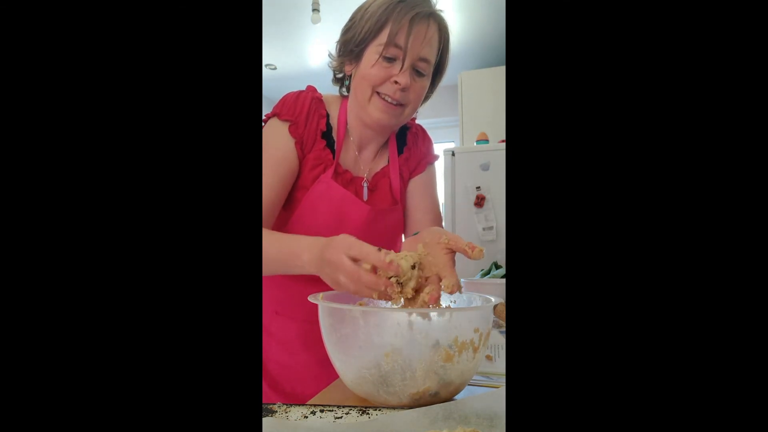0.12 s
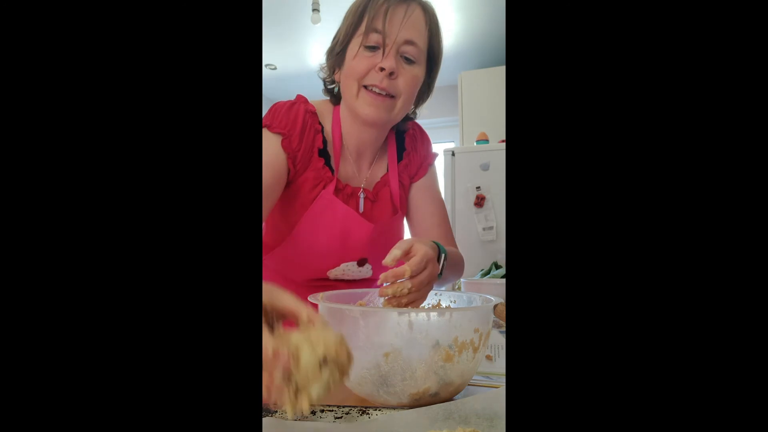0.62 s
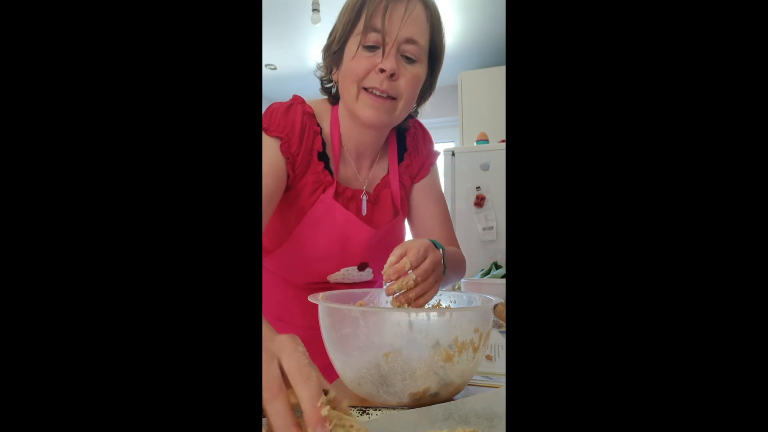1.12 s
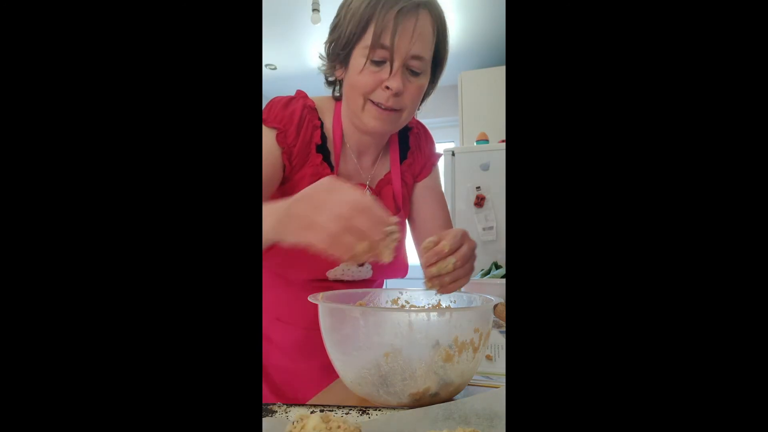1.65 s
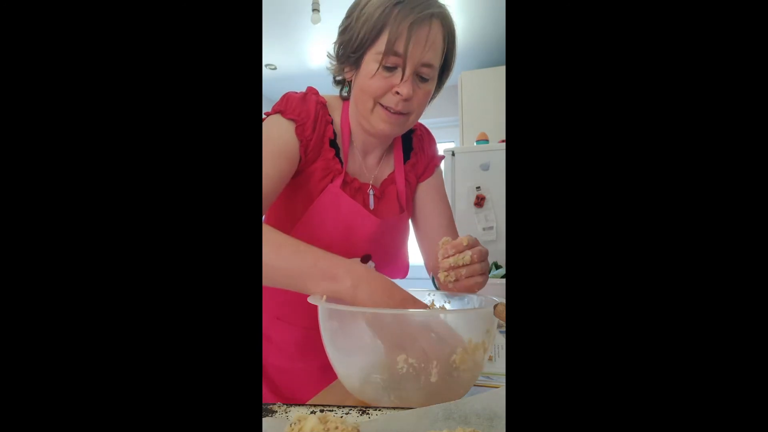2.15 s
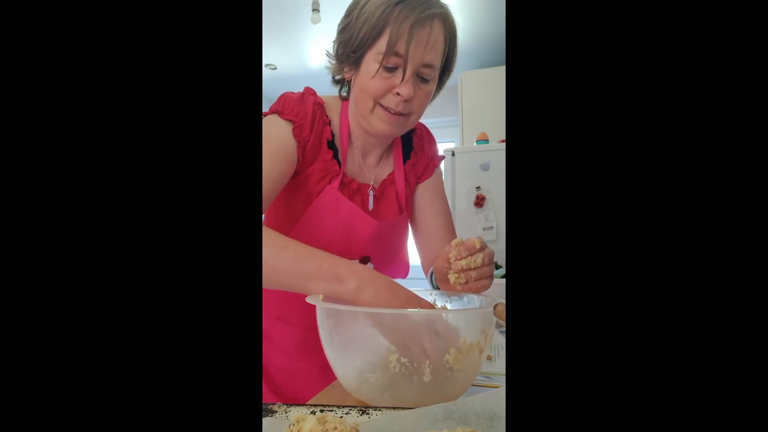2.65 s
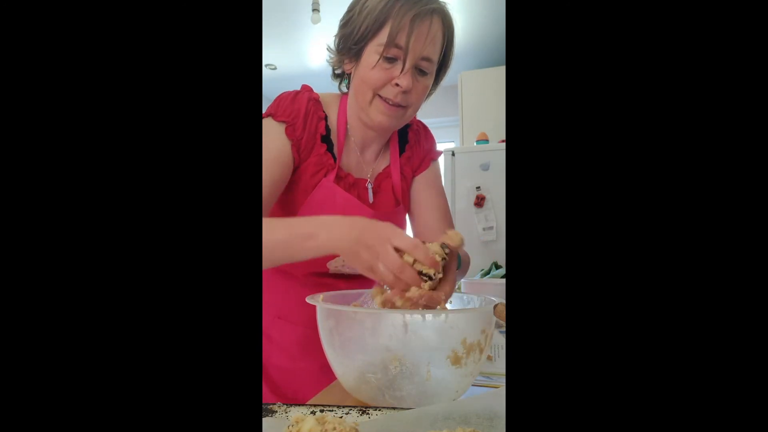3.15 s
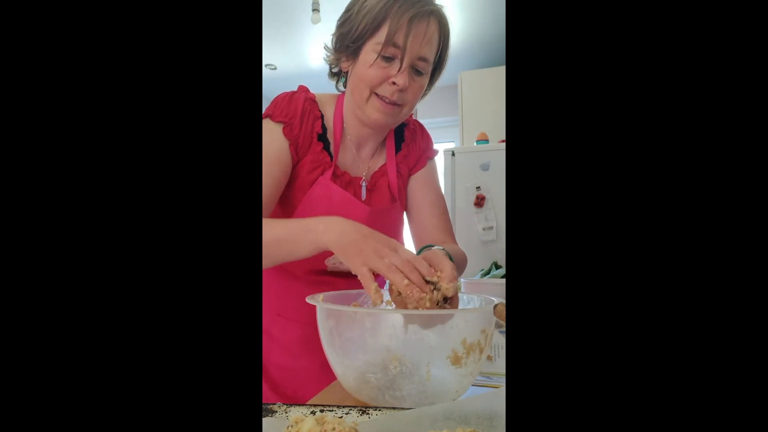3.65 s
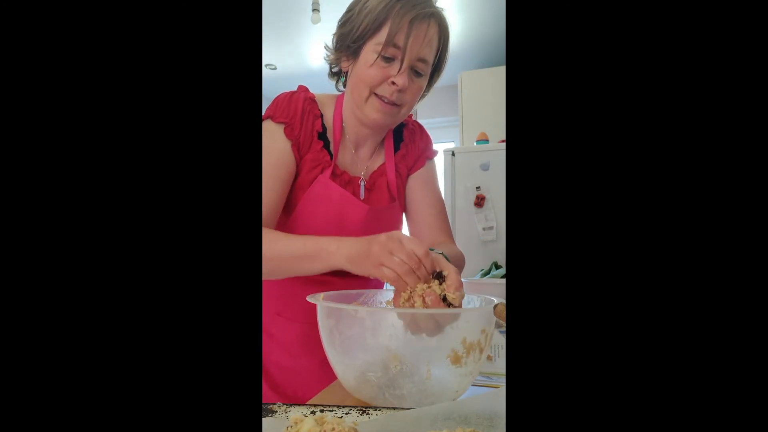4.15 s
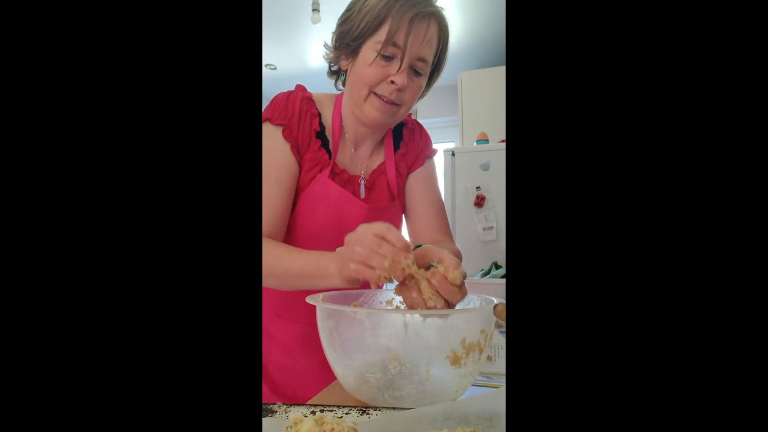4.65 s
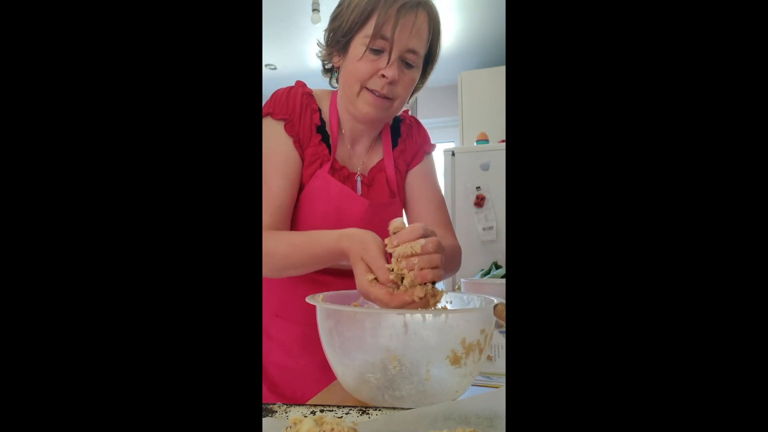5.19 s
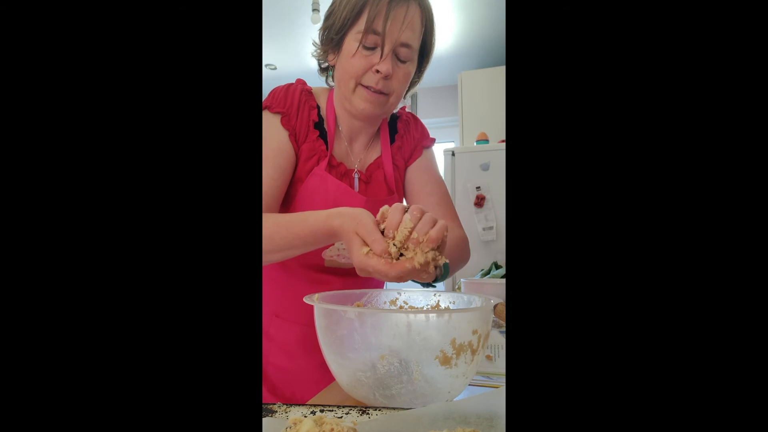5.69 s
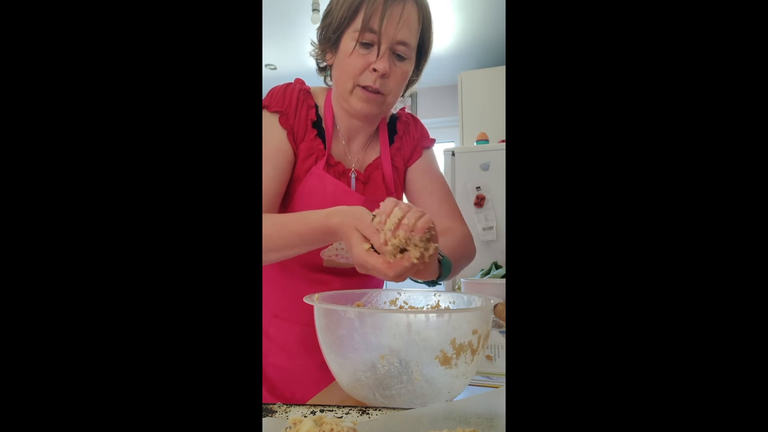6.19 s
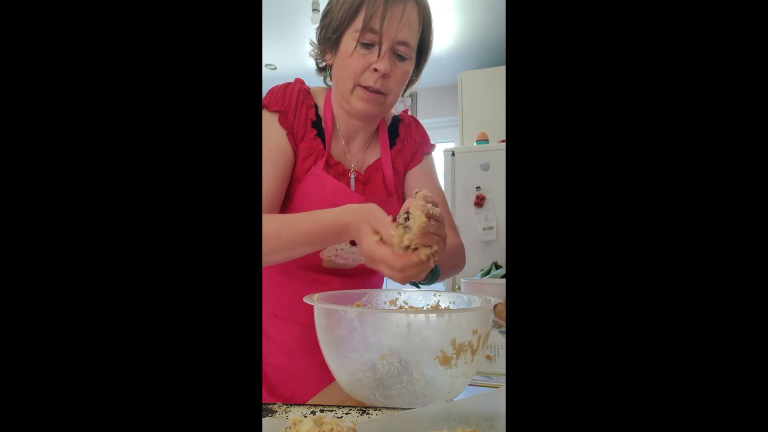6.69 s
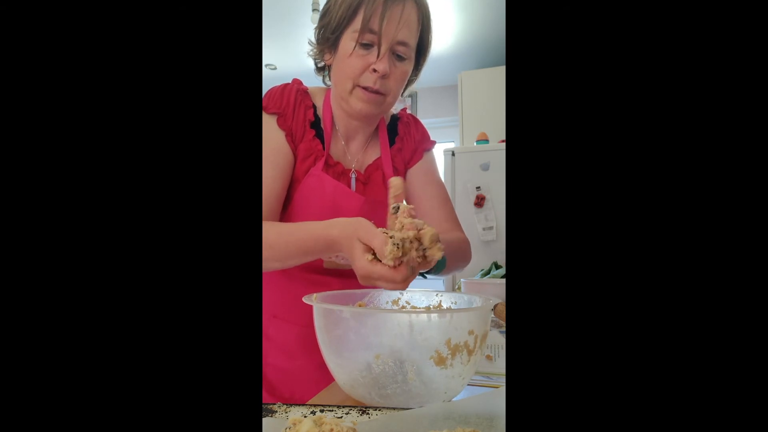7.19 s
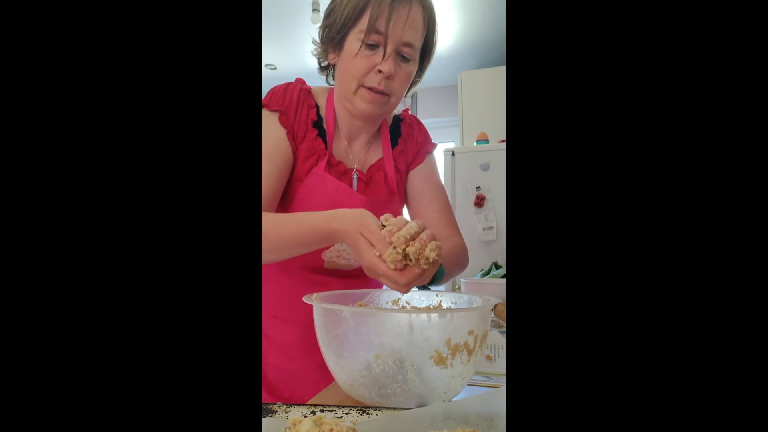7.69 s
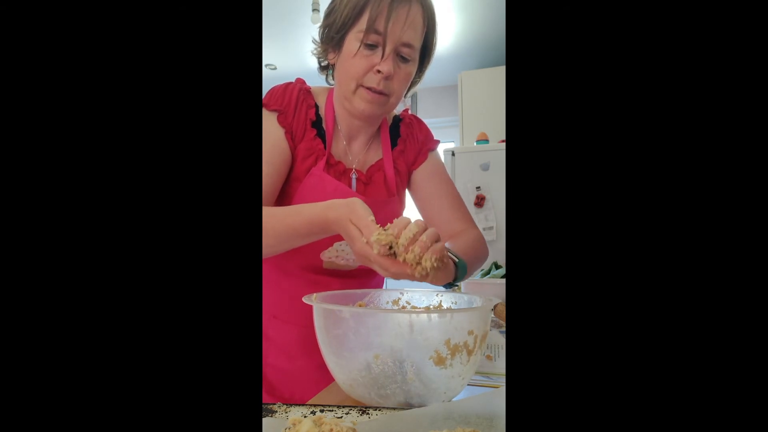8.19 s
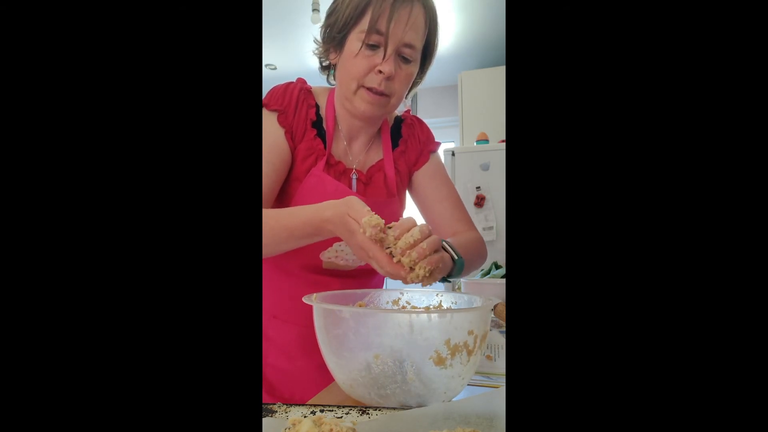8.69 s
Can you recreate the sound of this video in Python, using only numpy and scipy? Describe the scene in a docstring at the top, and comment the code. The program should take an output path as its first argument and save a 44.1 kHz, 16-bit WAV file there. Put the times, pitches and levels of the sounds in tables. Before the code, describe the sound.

Close hollow bumps on a plastic bowl, sticky dough clicks and squelches, short finger scrapes, and two bursts of loud wet squelching in a quiet kitchen.

```python
"""Sticky dough in a plastic bowl

Kitchen counter, phone microphone: hands squeeze and pull dough over a thin bowl, close by in a small live room.
Knocks ring the bowl's decaying modes, and low thuds come through the counter. Tearing dough smacks and
dragged dough rustles as filtered crackle; squeezed air pockets whistle as gliding narrow noise.
Behind them, shaped noise at a changing level and wavering sines make the noise floor and a refrigerator's hum.
"""
import sys
import numpy as np
from scipy import signal
from scipy.fft import rfft, irfft, next_fast_len
from scipy.io import wavfile

SR = 44100
rng = np.random.default_rng(int(sys.argv[2]) if len(sys.argv) > 2 else 0)


def wav_record(signal):
    """Record a signal, one row per channel, as 16-bit PCM in the file named by sys.argv[1]."""
    frames = np.transpose(np.atleast_2d(signal))
    bounded = np.clip(frames, -1, 1)
    # unit amplitude maps onto the largest positive 16-bit level
    quanta = np.round(bounded * 32767).astype(np.int16)
    wavfile.write(sys.argv[1], SR, quanta)


def natural_amplitude(level_db):
    """Convert a level in decibels to a linear amplitude factor, elementwise."""
    exponent = np.asarray(level_db, float) / 20
    return 10 ** exponent


N = 389403   # samples


def rms_one(x):
    """Scale a signal to rms 1."""
    return x / np.sqrt(np.mean(x ** 2) + 1e-20)


def in_time(rows):
    """Columns of a curve at every sample; the first column is time in seconds."""
    s, *columns = np.transpose(rows)
    return [np.interp(np.arange(N) / SR, s, c) for c in columns]


def drift(rate_hz):
    """Slow random wandering of rms 1: noise through two equal low-pass poles."""
    step = 40   # samples between drawn points
    r = np.exp(-2 * np.pi * rate_hz * step / SR)
    noise = rng.standard_normal(N // step + 2002)
    slow = signal.lfilter([1], [1, -2 * r, r * r], noise)[2000:]
    return np.interp(np.arange(N) / step, np.arange(len(slow)), rms_one(slow))


def coloured(x, spectrum, low_hz, high_hz):
    """The part of x between two edges, shaped by a spectrum; rms 1."""
    size = next_fast_len(N)
    hz = np.arange(1, size // 2 + 2) * SR / size
    points_hz, points_db = np.transpose(spectrum)
    edges = 1 / np.sqrt((1 + (low_hz / hz) ** 16) * (1 + (hz / high_hz) ** 16))
    gain = edges * natural_amplitude(np.interp(np.log(hz), np.log(points_hz), points_db))
    return rms_one(irfft(rfft(x, size) * gain, size)[:N])


def high_pass(x, cut_hz):
    """Second-order bass cut."""
    return signal.sosfilt(signal.butter(2, cut_hz, "high", fs=SR, output="sos"), x)


def ring(clicks, hz, t60_s):
    """A two-pole resonance: a unit click starts a decaying sine of height 1."""
    r, w = natural_amplitude(-60 / (t60_s * SR)), 2 * np.pi * hz / SR
    return signal.lfilter([0, np.sin(w)], [1, -2 * r * np.cos(w), r * r], clicks + 1e-18)


def strikes(times_s, heights, soft_ms):
    """Clicks smeared by a soft contact with an exponential decay."""
    clicks = np.zeros(N)
    at = np.clip(np.round(times_s * SR).astype(int), 0, N - 1)
    np.add.at(clicks, at, heights)
    r = np.exp(-1000 / (soft_ms * SR))
    return signal.lfilter([1 - r], [1, -r], clicks)


def crackle(per_s, spread_db, smooth):
    """Tiny strands snap in clumps, over a share of smooth hiss."""
    sizes = natural_amplitude(spread_db * np.minimum(rng.exponential(1, N), 5)) * rng.choice([-1, 1], N)
    snaps = rng.random(N) < per_s * natural_amplitude(3.0 * drift(30)) / SR
    return rms_one(sizes * snaps) + smooth * rng.standard_normal(N)


# colour of the background noise as it reaches us through the phone: pitch_hz, relative level_db
NOISE_COLOUR = [(30, -3), (70, 2.5), (166, -5), (249, -7.5), (384, 0.5), (451, -5.5), (620, -2.5),
                (775, -9.5), (1650, -14.5), (1940, -29), (2410, -28), (3160, -31), (7500, -37.5),
                (8100, -44.5), (16500, -38)]
# level of the background noise, raised by the phone's noise suppressor after loud sounds
# (written out as a curve): time_s, hiss level_db
NOISE_FLOOR = [(0, -65.5), (.12, -65), (.3, -71.5), (1.0, -77.5), (1.06, -69), (1.95, -77), (2.05, -59.5),
               (2.5, -61), (3.3, -68.5), (3.9, -66.5), (4.5, -70.5), (5.1, -71), (6, -67), (6.7, -71.5),
               (7.3, -68), (7.75, -68), (8.4, -71), (8.6, -75), (8.68, -70.5), (8.83, -74.5)]
# refrigerator motor lines: pitch_hz, level_db at the median noise floor
HUM_LINES = [(102.3, -74), (166.9, -66), (301.5, -86), (333.8, -69.5), (398.4, -78), (500.6, -70),
             (570.6, -66), (667.5, -68)]
HUM_WAVER_DB = 3.2
LOW_NOISE_DB, LOW_FOLLOWS = -61, 0.64   # low noise at the median floor; low noise and hum's share of its changes


def background():
    """Broad noise and a motor's wavering sines; hiss follows the noise floor, the low part follows in part."""
    hiss_db, = in_time(NOISE_FLOOR)
    lift_db = LOW_FOLLOWS * (hiss_db - np.median(hiss_db))
    white, t = rng.standard_normal(N), np.arange(N) / SR
    wobbling_t = t + 0.00019 * drift(4.4)
    hum = sum(natural_amplitude(db + HUM_WAVER_DB * drift(1.5)) * np.sin(2 * np.pi * hz * wobbling_t)
              for hz, db in HUM_LINES)
    low_gain = natural_amplitude(LOW_NOISE_DB + lift_db + 0.6 * drift(5.8))
    low = low_gain * coloured(white, NOISE_COLOUR, 27, 1600) + natural_amplitude(lift_db) * hum
    hiss = coloured(white, NOISE_COLOUR, 1900, 17000)
    return low + natural_amplitude(hiss_db + 0.73 * drift(6.7)) * hiss


KITCHEN_T60_S, KITCHEN_DB, WALL_CUT_HZ = 0.23, -15.5, 1300   # decay before wall loss, level, wall treble loss


def kitchen(x):
    """Room reflections: eight feedback delays, duller on every round, stepped block by block."""
    out, dull = np.zeros(N), np.exp(-2 * np.pi * WALL_CUT_HZ / SR)
    lags = (rng.uniform(0.0088, 0.03, size=8) * SR).astype(int)
    for k, lag in enumerate(lags):
        loop, state = x.copy(), [0.]
        gain = natural_amplitude(-60 * lag / SR / KITCHEN_T60_S)
        for i in range(lag, N, lag):
            back, state = signal.lfilter([gain * (1 - dull)], [1, -dull], loop[i - lag:i], zi=state)
            loop[i:i + lag] += back[:N - i]
        out += (loop - x) * (-1) ** k
    return high_pass(out, 300)


# thuds of the worktop: start_s, level_db, pitch_hz
COUNTER_THUDS = [(1.034, -34.5, 73.5), (2.123, -25, 85), (2.684, -34.5, 70), (2.906, -35, 77.6),
                 (4.29, -25, 83.4), (5.434, -36, 91), (5.695, -37, 85), (6.968, -34, 74.4),
                 (7.473, -43, 77), (7.8, -46, 73)]
THUD_T60_S = 0.18


def counter():
    """Dull low thuds through the worktop, each a soft strike on one low resonance."""
    thuds = sum(ring(strikes(np.array([s]), natural_amplitude(db), soft_ms=3.0), hz, THUD_T60_S)
                for s, db, hz in COUNTER_THUDS)
    return high_pass(thuds, 50)


# air squeezed out of pockets in the dough: start_s, length_s, from_hz, to_hz, level_db
AIR_POCKETS = [(0, .07, 4370, 4310, -67), (4.202, .26, 5330, 5130, -72), (4.207, .16, 3730, 3850, -71),
               (6.906, 0.047, 2312, 2640, -39), (7.441, .06, 2028, 2540, -30),
               (8.134, .07, 1245, 1009, -44.5), (7.492, .083, 1500, 1350, -38)]
# harder-driven air whistles more roughly: width at 0 dB, share of the level
LOUD_WIDTH_HZ, WIDTH_FOLLOWS = 1200, 0.45


def pockets():
    """Rough whistles, narrow noise on a carrier that glides as each pocket changes size."""
    out = np.zeros(N)
    for s, length, from_hz, to_hz, db in AIR_POCKETS:
        at, part = round(max(s, 0) * SR), np.linspace(0, 1, round(length * SR))
        r = np.exp(-np.pi * LOUD_WIDTH_HZ * natural_amplitude(WIDTH_FOLLOWS * db) / SR)
        complex_noise = [1, 1j] @ rng.standard_normal((2, SR // 2))
        rough = signal.lfilter([1], [1, -r], complex_noise)[-len(part):]
        turns = np.cumsum(from_hz + (to_hz - from_hz) * part) / SR
        envelope = np.minimum(part / 0.06, 1) * np.sqrt(1 - part)
        whistle = rms_one(np.real(rough * np.exp(2j * np.pi * turns)))
        out[at:at + len(part)] += natural_amplitude(db) * envelope * whistle
    return out


# fingers drag dough along the bowl: start_s, hold_s, level_db, wet rustle over the scrape_db
FINGER_STROKES = [(2.031, 0.026, -42, -11.5), (2.07, .075, -32, -15.5), (2.11, 0.021, -38, 3.5),
                  (2.174, .05, -32.5, -13), (2.23, 0.054, -32, -5), (2.277, 0.034, -35, -4),
                  (2.336, 0.044, -51.5, -7), (2.445, 0.051, -47.5, -10), (2.533, 0.08, -56, -9),
                  (2.624, 0.049, -50, -5.5), (2.881, 0.023, -54.5, 0), (3.407, 0.038, -62, -9),
                  (3.507, 0.037, -49, -10), (3.564, 0.14, -48.5, -10), (3.703, 0.063, -59, -2),
                  (3.838, .08, -52, -8), (4.102, 0.074, -58, -2), (4.18, 0.044, -54.5, -2.5),
                  (4.262, 0.069, -55, -10), (6.915, .04, -40.5, -15.5), (6.974, 0.061, -36, -6),
                  (7.097, 0.052, -56.5, -4), (7.428, 0.066, -35.5, -10), (7.483, 0.016, -30.5, -12.5),
                  (7.513, .03, -51, -26), (8.13, 0.042, -49, -26)]
RISE_DB_PER_S, FALL_DB_PER_S = 897, 417   # a stroke grips fast and lets go more slowly


def strokes():
    """Finger pressure rises, holds and falls, shared by scrape and wet rustle; overlaps add in power."""
    t, power = np.arange(N) / SR, np.zeros((2, N))
    for s, hold, db, wet_db in FINGER_STROKES:
        near = slice(round((s - 0.2) * SR), round((s + hold + 0.3) * SR))
        rise_loss_db = RISE_DB_PER_S * np.maximum(s - t[near], 0)
        fall_loss_db = FALL_DB_PER_S * np.maximum(t[near] - s - hold, 0)
        level_db = db - rise_loss_db - fall_loss_db + np.array([[0], [wet_db]])
        power[:, near] += natural_amplitude(2 * level_db)
    return np.sqrt(power)


# colour of the crackle, for rubbing and smacks, including the phone's dip and treble step:
# pitch_hz, relative level_db
CRACKLE_COLOUR = [(300, -25.5), (500, -18), (634, 7.5), (774, -5), (1300, 6.5), (1690, 0), (1970, -7),
                  (2400, -2), (2980, -13), (5340, -17.5), (7400, -28.5), (8000, -45), (10000, -41),
                  (13500, -36.5), (16500, -52)]
TOP_RUSTLE_DB = -10.5   # the highest rustle, under the wet one


def rubbing():
    """Coarse slips drive the bowl's own modes; finer crackle comes straight off the wet dough."""
    pressure, wetness = strokes()
    slips = crackle(per_s=820, spread_db=2.5, smooth=0.76)
    fine = crackle(per_s=3300, spread_db=1.5, smooth=0.8)
    grip = [natural_amplitude(3 * drift(10)) for part in range(3)]   # the hand damps wall, rim and lip independently
    rung = 0
    for hold, modes in zip(grip, (WALL_MODES, RIM_MODES, LIP_MODES)):
        part = sum(natural_amplitude(db) * rms_one(ring(slips, hz, 0.99 * t60)) for hz, db, t60 in modes)
        rung = rung + hold * part
    scrape = rms_one(1.8 * rms_one(rung) + coloured(slips, CRACKLE_COLOUR, 300, 2900))
    top = coloured(fine, CRACKLE_COLOUR, 7800, 17000)
    wet = coloured(fine, CRACKLE_COLOUR, 3300, 9100) + top * natural_amplitude(TOP_RUSTLE_DB + 2.8 * drift(30))
    return natural_amplitude(1.3 * drift(25)) * (scrape * pressure + wet * wetness)


# dough tears off the skin: start_s, level_db, brightness_db before the shares below,
# dull body over the smack_db, tail t60_s
DOUGH_SMACKS = [(.0612, -59, 11, -11, 0.11), (1.035, -65, 0.5, 5, 0.094), (2.0, -42, -21, -7, 0.13),
                (2.0594, -38.5, -23.5, -13, 0.12), (2.1049, -32, -22, -11, 0.09),
                (2.897, -49, -8, 7, 0.094), (3.0066, -50.5, -12, 4.5, 0.24), (3.1108, -55, 8.5, -10, 0.15),
                (3.4406, -71, 8.5, -11, 0.094), (3.464, -56.5, 1.5, 11.5, 0.15),
                (3.5642, -59.5, 1, 17, 0.15), (3.6031, -39.5, 0, -4, 0.09), (3.6117, -40, 1.5, 5, 0.15),
                (3.696, -69, -3, 6, 0.068), (3.7235, -41, -4, 3.5, 0.074), (3.8, -57, 2, 0, 0.06),
                (3.8166, -54.5, 3.5, -2, 0.054), (3.8616, -62, 4, -6, 0.089), (3.89, -59.5, 5, 8, 0.088),
                (3.996, -58, -10, -13, 0.14), (4.0845, -49.5, 0, -12, 0.1), (4.125, -62, 3, 7, .098),
                (4.1613, -49.5, -3.5, 11, 0.068), (4.193, -40.5, -6.5, -10, 0.046),
                (4.2916, -55, -5, 13, 0.2), (4.6167, -60, -5, -16, 0.16), (4.665, -56, -19, -13, .098),
                (4.8404, -65.5, -1, 0, 0.14), (4.8744, -60, -5.5, 8, 0.1), (5.118, -61, 2, 5, 0.15),
                (5.27, -70, -9, 4, .1), (5.355, -68, -10, 13, 0.068), (5.4414, -60, -6.5, 0, 0.29),
                (5.6934, -72, 2, 14, 0.29), (5.8113, -58, 2, -17, .12), (5.9384, -42.5, 1, -8, 0.11),
                (6.084, -52, 7, -26, 0.13), (6.285, -57.5, -3, -13, 0.11), (6.776, -59.5, -7.5, 7.5, 0.18),
                (6.794, -58.5, 3, 9, 0.21), (6.831, -59.5, 2, 7, 0.087), (6.844, -41, 1, -10.5, 0.13),
                (6.912, -19.5, -23.5, -41, 0.098), (6.9622, -19, -11, -9, 0.12),
                (7.0616, -35.5, -13, -27, 0.088), (7.097, -52.5, 3.5, -14, 0.081),
                (7.1726, -59.5, -1, -4, 0.14), (7.2352, -52.5, -6, -9, 0.17),
                (7.4168, -16, -15, 0.5, 0.071), (7.455, -54, 8.5, -1, 0.082), (7.483, -45, 0, -1, 0.084),
                (7.602, -53.5, 4, 3, 0.19), (7.6686, -54.5, -10, 9, 0.13), (7.697, -63, 1, -7, .07),
                (7.7377, -54.5, -13, 1, 0.12), (7.882, -59, 3, -18, 0.11), (8.045, -63, -9, -13, 0.07),
                (8.1236, -50.5, -21, 9, 0.13), (8.1662, -54.5, 8.5, 8, 0.09), (8.2422, -62.5, -2, -4, .12),
                (8.296, -63.5, -5, -8, 0.32), (8.64, -74.5, 3.5, -6, .17)]
BRIGHT_SHARE, TOP_SHARE = 1.01, 1.45   # how far the brightness of a smack lifts its bright and top parts


def smacks():
    """A sharp snap and a wet tail of crackle, each tear with its own balance of four bands."""
    bands = ((2000, 3800), (900, 1850), (3800, 7700), (7800, 17000))   # Hz: main, dull, bright, top
    shapes, t = np.zeros((len(bands), N + SR)), np.arange(SR // 3) / SR
    for s, db, tilt_db, dull_db, t60 in DOUGH_SMACKS:
        band_db = db + np.array([0, dull_db, tilt_db * BRIGHT_SHARE, tilt_db * TOP_SHARE])
        tail, snap = natural_amplitude(-60 * t / max(t60, 0.02)), 0.66 * np.exp(-t / 0.0035)
        shape = (1 - np.exp(-t / 0.0027)) * (tail + snap)
        at = round(s * SR)
        shapes[:, at:at + len(t)] += shape * natural_amplitude(band_db)[:, None]
    grains = crackle(per_s=2600, spread_db=3.5, smooth=0.85)
    return sum(coloured(grains, CRACKLE_COLOUR, *band) * shape[:N] for band, shape in zip(bands, shapes))


# knocks on the bowl, levels before each mode's own: start_s, boom_db, boom pitch_hz, wall_db, rim_db
BOWL_KNOCKS = [(1.999, -33.5, 233, -46, -58), (2.047, -26.5, 209, -34.5, -53), (2.118, -23, 191, -18, -19),
               (2.126, -8.5, 198, -4, -16.5), (2.288, -29, 205, -33, -28.5), (2.375, -39, 212, -44, -68),
               (2.836, -55, 248, -39, -55), (2.901, -19.5, 248, -30, -38), (2.992, -29, 221, -40, -52),
               (3.012, -15, 200, -22, -30), (3.602, -32.5, 246, -27, -30), (3.714, -56, 191, -36.5, -34.5),
               (4.15, -27.5, 228, -24.5, -43), (4.191, -48, 191, -49, -28.5), (4.284, -21.5, 240, -35, -41),
               (4.295, -12.5, 217, -24, -28.5), (5.142, -47.5, 249, -54, -60), (5.275, -50, 239, -54, -65),
               (5.424, -36, 191, -38, -49), (5.435, -20, 228, -25.5, -33.5),
               (5.694, -25.5, 229, -30.5, -37.5), (5.937, -28, 232, -29, -40), (6.287, -45, 244, -46, -67),
               (6.775, -42, 246, -28, -29), (6.909, -37, 205, -38, -39), (6.967, -13, 205, -20, -29.5),
               (6.995, -12, 205, -23, -26.5), (7.232, -51, 250, -47.5, -56), (7.418, -20.5, 231, -14, -17),
               (7.479, -27.5, 242, -17.5, -15), (7.671, -31.5, 221, -26, -60),
               (7.814, -39.5, 249, -50, -62.5), (8.125, -33, 218, -16.5, -27),
               (8.297, -34.5, 235, -54, -65), (8.328, -45, 248, -39, -62)]
# modes of the bowl, two booms, then wall, rim and lip: pitch_hz, level_db, t60_s
BOOM_MODES = [(205, 6.5, 0.099), (251.3, 6, 0.096)]
WALL_MODES = [(479, -7.5, 0.049), (624, 1.5, 0.034), (691, -0.5, .05), (858, -5.5, 0.03), (920, -6, 0.014)]
RIM_MODES = [(1030, -10, 0.061), (1188, -6.5, 0.075), (1350, -7, 0.07), (1434, -1, 0.039),
             (1733, -7.5, .05)]
LIP_MODES = [(2076, 0.5, 0.013), (2397, 6, 0.049), (2560, -4.5, 0.018)]
LIP_UNDER_RIM_DB = 17


def bowl():
    """Each knock shares its push between the beating booms and wakes wall, rim and lip anew."""
    s, boom_db, hz, wall_db, rim_db = np.transpose(BOWL_KNOCKS)
    low_boom_hz, high_boom_hz = BOOM_MODES[0][0], BOOM_MODES[1][0]
    upper = np.clip((hz - low_boom_hz) / (high_boom_hz - low_boom_hz), 0, 1)
    shares = (1 - 0.54 * upper, -(0.46 + 0.95 * upper))
    out = sum(ring(strikes(s, share * natural_amplitude(boom_db + db), soft_ms=0.79), f, t60)
              for share, (f, db, t60) in zip(shares, BOOM_MODES))
    parts = ((WALL_MODES, wall_db, 0.2), (RIM_MODES, rim_db, 0.06),
             (LIP_MODES, rim_db - LIP_UNDER_RIM_DB, 0.06))
    for modes, level_db, soft_ms in parts:
        for k, (f, db, t60) in enumerate(modes):
            luck = rng.normal(0, 1, (len(s), 2))
            late = s + 0.0008 * np.abs(luck[:, 1])   # small random delay for every mode and knock
            heights = (-1) ** k * natural_amplitude(level_db + db + 4.5 * luck[:, 0])
            out = out + ring(strikes(late, heights, soft_ms), f, t60)
    return high_pass(out, 130)   # the knocks carry no deep bass


def scene():
    """Bowl and dough up close with their room reflections, the counter and the background."""
    near = bowl() + smacks() + rubbing() + pockets()
    return (near + natural_amplitude(KITCHEN_DB) * kitchen(near) + counter() + background())[None]


def roll_off(x):
    """The treble ends steeply here."""
    return signal.sosfilt(signal.butter(12, 16660, fs=SR, output="sos"), x)


def record(dry):
    """A phone microphone with a bass cut, a top cut and a dip near 2 kHz."""
    b, a = signal.iirnotch(1930, 9.0, SR)
    dry = signal.sosfilt(signal.butter(4, 48, "high", fs=SR, output="sos"), dry)
    dry = signal.sosfilt(signal.cheby2(12, 60, 16900, fs=SR, output="sos"), dry)
    mix = 0.39 * dry + 0.65 * signal.lfilter(b, a, dry)   # the unnotched share keeps the dip shallow
    return roll_off(mix)


dry = scene()
out = record(dry)
wav_record(out)
```